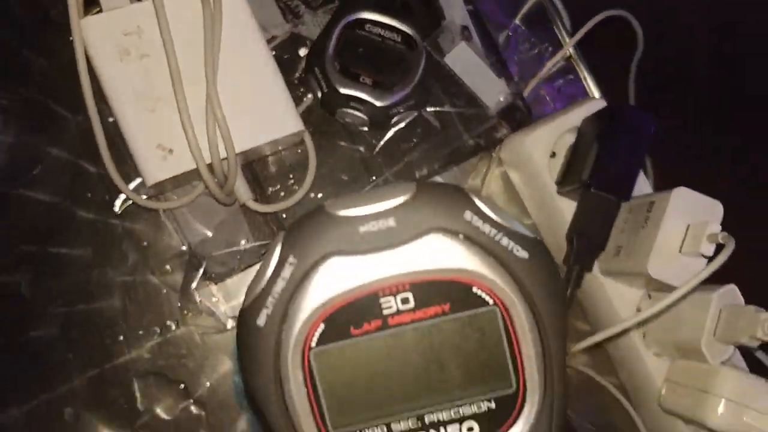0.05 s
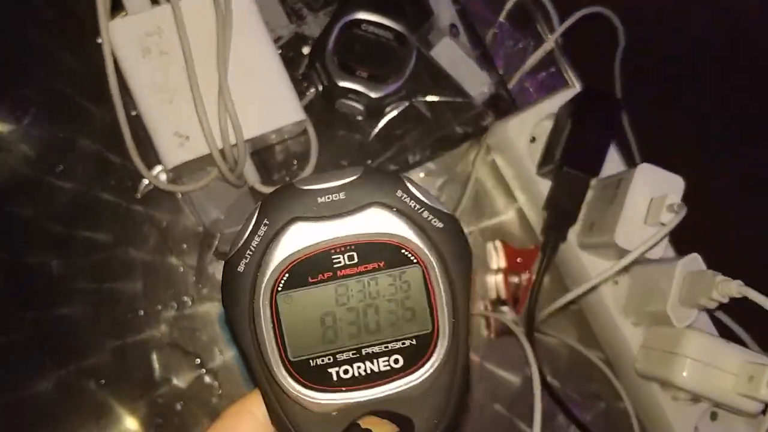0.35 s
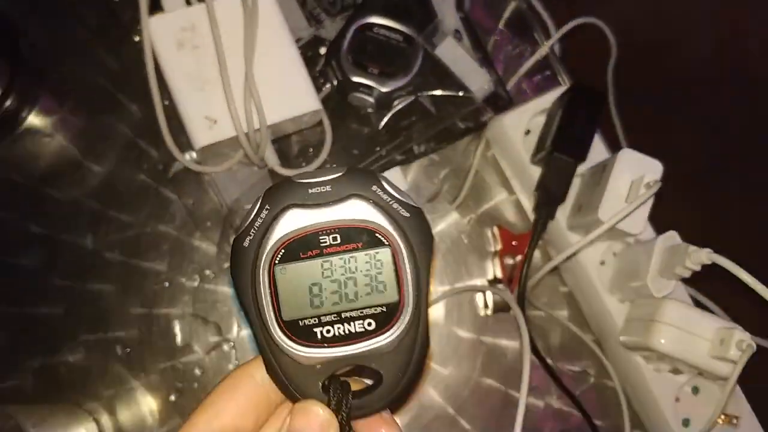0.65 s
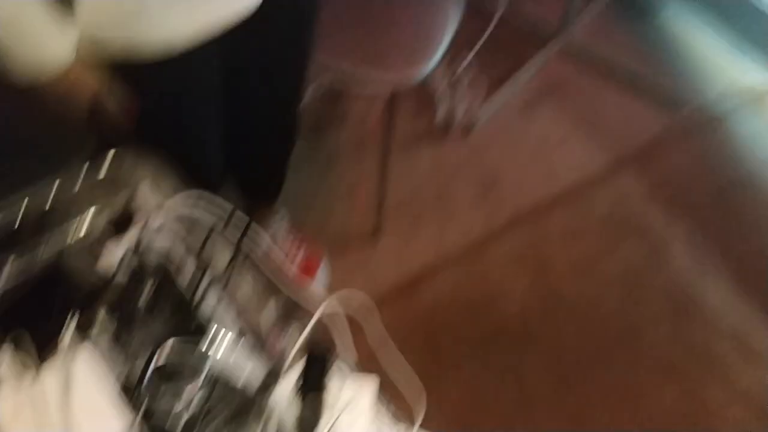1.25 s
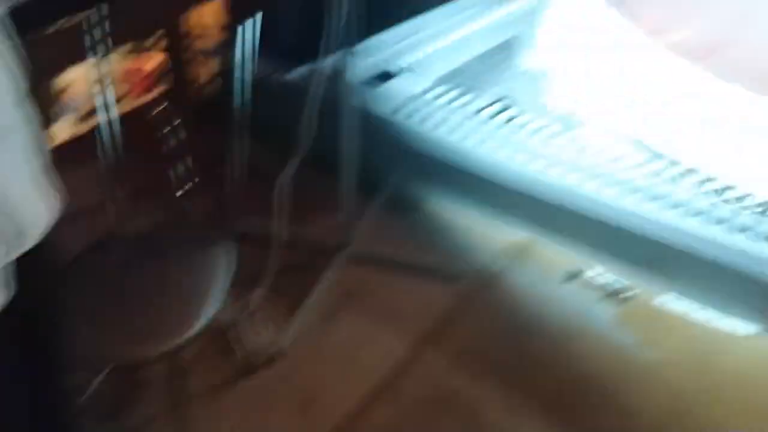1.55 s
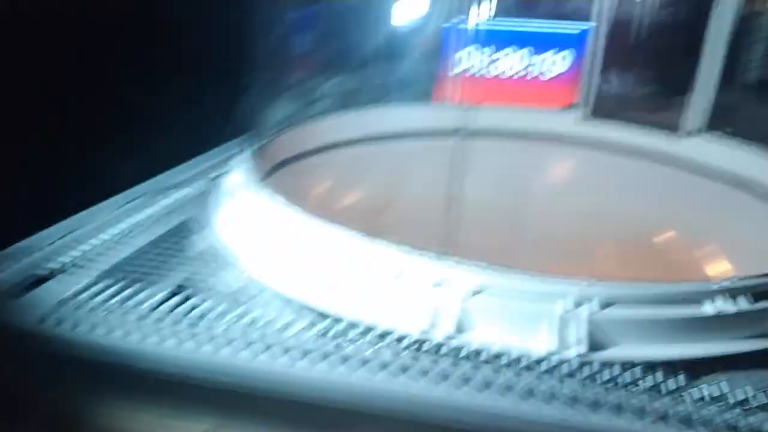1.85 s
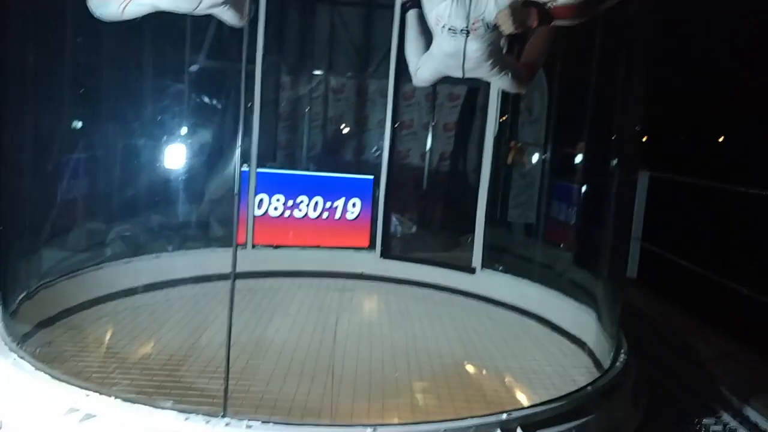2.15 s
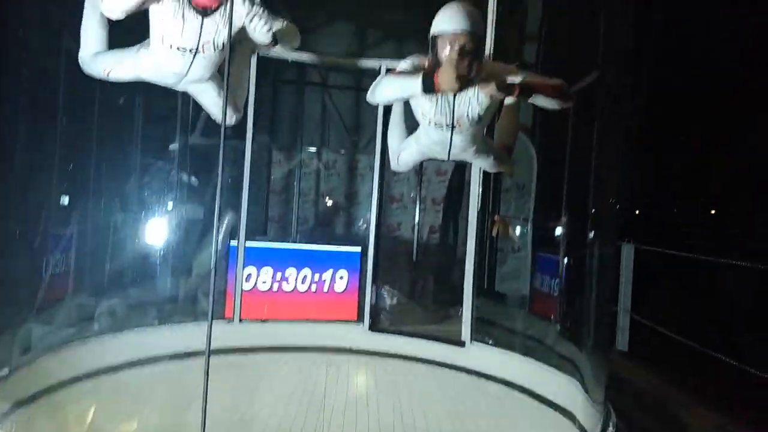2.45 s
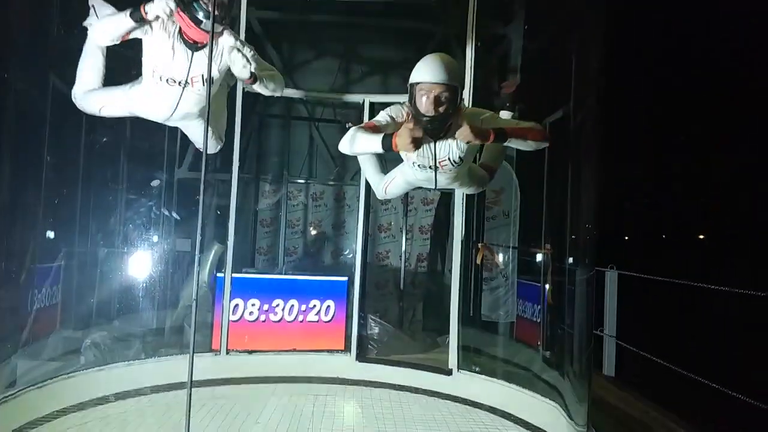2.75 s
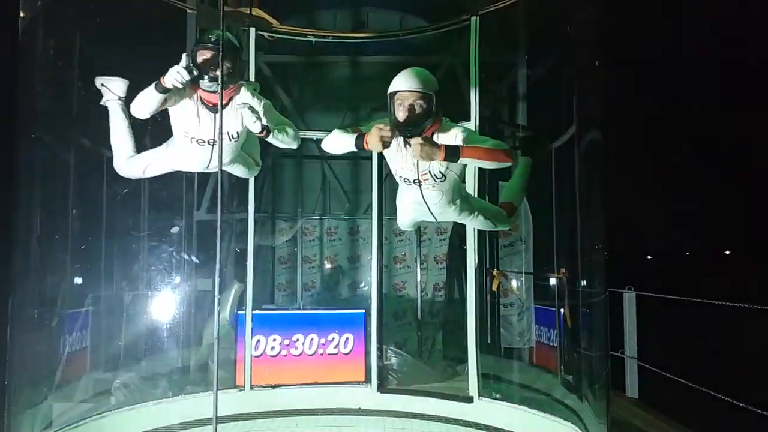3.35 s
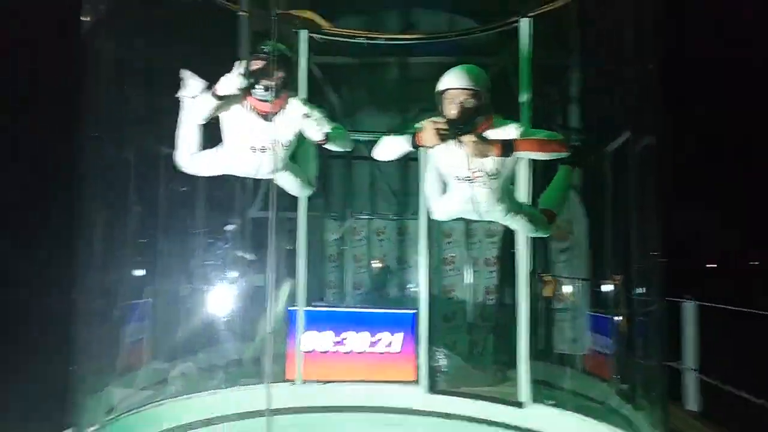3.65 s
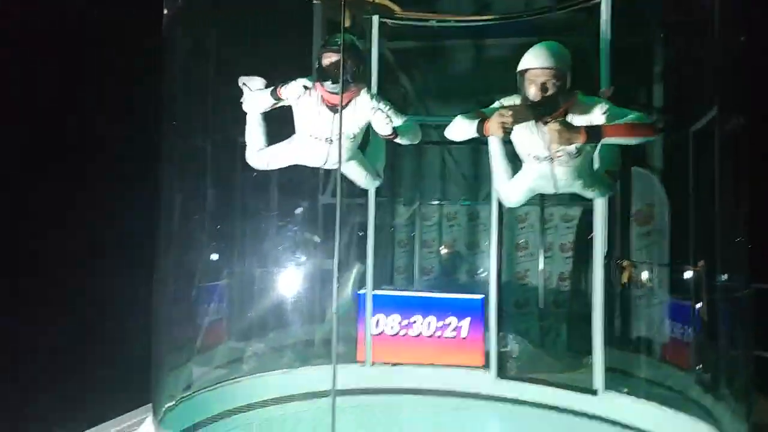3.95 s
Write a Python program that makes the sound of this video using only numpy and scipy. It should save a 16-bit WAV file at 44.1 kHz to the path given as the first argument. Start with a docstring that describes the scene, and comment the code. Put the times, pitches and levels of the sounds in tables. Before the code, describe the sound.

A loud, continuous wind tunnel roar booms and buffets close to a handheld microphone. The rush is dull at first, with one faint bump, then opens into hissing, shrill air as the microphone faces the chamber.

```python
"""A vertical wind tunnel at full flow. From the start its duct booms near 200 Hz under a churning
roar of fans and air; the camera faces away and hears a dull rush. At 1.4 s, one soft knock as the
camera is moved. Near 2.3 s it swings round to the chamber: the hiss of the air stream opens up and
a shrill band near 4.4 kHz swells. Both stay up to the end."""
import sys
import numpy as np
from scipy import signal
from scipy.fft import rfft, irfft, next_fast_len
from scipy.io import wavfile
from scipy.ndimage import uniform_filter1d, map_coordinates

SR = 44100
rng = np.random.default_rng(int(sys.argv[2]) if len(sys.argv) > 2 else 0)


def inscribe(sig):
    """Save sig as 16-bit PCM at rate SR to the path in sys.argv[1].

    A 1-D sig is mono; a 2-D sig holds one channel per row.
    Samples are clipped to [-1, 1] before scaling.
    """
    pcm = np.round(np.clip(np.atleast_2d(sig).T, -1, 1) * 32767)
    wavfile.write(sys.argv[1], SR, pcm.astype(np.int16))


N = 176400


def amp(db):
    """dB to gain."""
    return 10 ** (np.asarray(db) / 20)


def unit(x):
    """Scale to rms 1."""
    return x / np.sqrt(np.mean(x ** 2) + 1e-20)


def curve(rows):
    """(time_s, value) rows to one value per sample."""
    return np.interp(np.arange(N) / SR, *np.transpose(rows))


def wobble(rate_hz):
    """Smooth random curve, rate_hz knots per second."""
    return map_coordinates(rng.standard_normal(2048), [np.arange(N) * rate_hz / SR], mode="wrap")


def filtered(x, response):
    """Zero-phase filter with gain response(hz)."""
    size = next_fast_len(N + SR // 2)
    return irfft(rfft(x, size) * response(np.fft.rfftfreq(size, 1 / SR)), size)[:N]


def coloured(x, colour):
    """Shape x by (freq_hz, gain_db) rows on a log axis; rms 1."""
    freq_hz, gain_db = np.transpose(colour)
    return unit(filtered(x, lambda hz: amp(np.interp(np.log(hz + 1), np.log(freq_hz + 1), gain_db))))


def turbulence(colour, patchy_db):
    """Coloured noise, rms 1; eddies make patches of random gain."""
    spectrum = signal.stft(rng.standard_normal(N), nperseg=512)[2]
    eddies = uniform_filter1d(rng.standard_normal(spectrum.shape), size=3, axis=0)
    eddies = uniform_filter1d(eddies, size=12, axis=1)
    noise = signal.istft(spectrum * amp(patchy_db * unit(eddies)))[1][:N]
    return coloured(noise, colour)


def flow(levels, colours, patchy_db, flutter_db, flutter_hz):
    """Fluttering turbulence that changes colour as the camera turns to the chamber."""
    turn_mid_s, turn_length_s = 2.31, 0.19
    freq_hz, away_db, facing_db = np.transpose(colours)
    away = turbulence(list(zip(freq_hz, away_db)), patchy_db)
    facing = turbulence(list(zip(freq_hz, facing_db)), patchy_db)
    turned = np.clip(.5 + (np.arange(N) / SR - turn_mid_s) / turn_length_s, 0, 1)
    gain = amp(curve(levels) + flutter_db * wobble(flutter_hz))
    return gain * (np.sqrt(1 - turned) * away + np.sqrt(turned) * facing)


def reflections(x, low_cut_hz=342, sway_s=0.00017, echo_db=-22):
    """Weak echoes off nearby surfaces; delays drift as the hand-held camera sways."""
    bright = filtered(x, lambda hz: hz ** 2 / (hz ** 2 + low_cut_hz ** 2))
    echoes = np.zeros(N)
    for mean_delay_s in np.geomspace(.0018, .009, 6):
        delay_s = mean_delay_s + sway_s * wobble(rate_hz=1.5)
        echoes += map_coordinates(bright, [np.arange(N) - delay_s * SR])
    return amp(echo_db) * echoes


def knock(attack_s=0.00091, t60_s=0.045):
    """Dull handling knock: a noise burst half buried in the roar."""
    # impact: start_s, level_db
    hits = [(1.366, -8.5)]
    # spectrum: freq_hz, gain_db
    colour = [(300, -15), (900, 18), (1400, 11), (2200, 8.5), (3500, -7), (7000, -25), (11000, -58)]
    out = np.zeros(N)
    for start_s, level_db in hits:
        age_s = np.maximum(np.arange(N) / SR - start_s, 0)
        envelope = (1 - np.exp(-age_s / attack_s)) * np.exp(-np.log(1000) * age_s / t60_s)
        out += amp(level_db) * envelope * coloured(rng.standard_normal(N), colour)
    return out


def hiss(trim_db=2.5, shade_per_octave=0.35, pivot_hz=8100):
    """Air-stream hiss, weaker and darker while the camera faces away."""
    # envelope: time_s, level_db
    levels = [(0, -49.5), (1.11, -48.5), (1.34, -46), (1.75, -49.5), (1.94, -45), (2.11, -47.5), (2.2, -41),
              (2.27, -39), (2.39, -24), (2.83, -24), (3.05, -25.5), (3.45, -25), (3.62, -23.5), (4, -24.5)]
    # spectrum facing the chamber: freq_hz, gain_db
    colour = [(2000, -30), (4000, -1.5), (5300, 1.5), (6300, 2), (7400, 3), (8500, 2), (9400, 1.5),
              (9750, -2.5), (10200, -10.5), (10800, -25), (11200, -33)]
    freq_hz, time_s, spectrum = signal.stft(turbulence(colour, patchy_db=.6), SR, nperseg=256)
    level_db = np.interp(time_s, *np.transpose(levels))
    facing_db = level_db.max()
    shade = np.clip(1 + shade_per_octave * np.log2((freq_hz[:, None] + 1) / pivot_hz), 0, 2)
    shaded = spectrum * amp(shade * (level_db - facing_db))
    return amp(trim_db + facing_db) * signal.istft(shaded)[1][:N]


def whistle(centre_hz, width_hz, wander_hz, flare_db):
    """Narrow air-stream resonance; wanders in pitch, flares briefly."""
    def baseband():
        return unit(filtered(rng.standard_normal(N), lambda hz: 1 / (1 + (2 * hz / width_hz) ** 4)))
    in_phase, quadrature = baseband(), baseband()
    pitch_hz = centre_hz + wander_hz * wobble(rate_hz=20)
    phase = 2 * np.pi * np.cumsum(pitch_hz) / SR
    band = in_phase * np.cos(phase) + quadrature * np.sin(phase)
    return unit(amp(flare_db * wobble(rate_hz=26)) * band)


def air(rush_db=2.03, shrill_db=-0.36, low_whistle_db=-9.5, high_whistle_db=-4.5):
    """Dull rush and shrill band of the air stream, each with a breathy whistle."""
    # envelopes: time_s, level_db
    rush_levels = [(0, -25.5), (.85, -26), (1.0, -27.5), (1.8, -26.5), (2.1, -26.5), (2.18, -22.5),
                   (2.31, -25.5), (2.44, -30.5), (2.7, -31.5), (4, -30.5)]
    shrill_levels = [(0, -26.5), (.6, -25), (.85, -25), (1.0, -27.5), (1.45, -26.5), (1.8, -27.5),
                     (2.14, -26), (2.21, -20), (2.26, -19.5), (2.305, -16), (2.36, -20.5), (2.45, -21),
                     (2.6, -23.5), (2.83, -19.5), (3.0, -22), (3.6, -20.5), (4, -20)]
    # spectra: freq_hz, away_db, facing_db
    rush_colours = [(600, -47, -43), (1370, -13, 0.5), (1880, -0.1, -1), (2440, 3.5, -2), (2890, 2.4, 1),
                    (3700, -3.5, 1.5), (4500, -10.5, -14), (5470, -6, -24), (6550, -16, -10),
                    (7600, -39, -36), (10000, -72, -68)]
    shrill_colours = [(3000, -40, -41), (3720, -7, -23), (3970, 2.5, 0.5), (4670, 0, 1), (4930, -1, -1.5),
                      (5310, -10, -8), (6340, -31, -13.5), (7540, -63, -50)]
    rush = flow(rush_levels, rush_colours, patchy_db=1.83, flutter_db=1.23, flutter_hz=22)
    shrill = flow(shrill_levels, shrill_colours, patchy_db=2.0, flutter_db=0.47, flutter_hz=22)
    low = whistle(centre_hz=2556, width_hz=200, wander_hz=45.34, flare_db=4.5)
    high = whistle(centre_hz=4370, width_hz=350, wander_hz=94.95, flare_db=1.8)
    low *= amp(curve(rush_levels) + low_whistle_db)
    high *= amp(curve(shrill_levels) + high_whistle_db)
    return amp(rush_db) * rush + amp(shrill_db) * shrill + low + high


def buffeting(trim_db=-1.5, flutter_db=1.5):
    """Lumpy low buffeting of the flow."""
    # envelope: time_s, level_db
    levels = [(0, -40), (.45, -29), (.68, -28), (.95, -28), (1.18, -20), (1.35, -28), (1.62, -20.5),
              (1.77, -23.5), (1.94, -20.5), (2.1, -22), (2.25, -38), (2.42, -24), (3.2, -34), (3.47, -24.5),
              (4, -44)]
    # spectrum: freq_hz, gain_db
    colour = [(150, -56), (240, 6), (310, 1), (430, 2), (520, -17), (700, -16), (1300, -62)]
    level_db = trim_db + curve(levels) + flutter_db * wobble(rate_hz=23.83)
    return amp(level_db) * turbulence(colour, patchy_db=2.5)


def duct_boom(trim_db=-1.5):
    """The duct booms near 200 Hz."""
    # envelope: time_s, level_db
    levels = [(0, -21), (.9, -19), (1.05, -23.5), (1.35, -18.5), (1.8, -22.5), (2.15, -23), (2.3, -29),
              (2.45, -22.5), (2.6, -21), (2.8, -30.5), (3.15, -22.5), (3.42, -30.5), (3.58, -22.5),
              (4, -26.5)]
    # spectra: freq_hz, away_db, facing_db
    colours = [(25, -72, -63), (55, -60, -62), (77, -40, -35), (124.7, -19, -16.5), (155.5, -7.5, -20),
               (170, -5, -17), (195, 2, 4.5), (212.4, 2.5, 2.5), (227.4, -9.5, 6.5), (308, -20, -56),
               (700, -91, -74)]
    return amp(trim_db) * flow(levels, colours, patchy_db=0.5, flutter_db=0.8, flutter_hz=17)


def fan_roar(trim_db=0.5):
    """Broad, churning turbulence of fans and air."""
    # envelope: time_s, level_db
    levels = [(0, -20), (.25, -20), (.5, -21), (.95, -21), (1.09, -20.5), (1.3, -20.5), (1.7, -21.5),
              (1.95, -20.5), (2.15, -20), (2.38, -23.5), (2.9, -20.5), (3.4, -21.5), (4, -21.5)]
    # spectra: freq_hz, away_db, facing_db
    colours = [(30, -77, -70), (79.6, -53.5, -35), (167, -25.5, 0), (236, -4.5, -3.5), (275, 1, 4),
               (305, -2.5, -1), (440, -4, -3.5), (540, -3.5, -2.5), (650, -3.5, -6), (917, -9, -8),
               (1484, -12, -15.5), (2360, -24, -18.5), (5000, -35, -38), (9000, -78, -68)]
    return amp(trim_db) * flow(levels, colours, patchy_db=2.5, flutter_db=0.46, flutter_hz=20)


def scene():
    """All sources plus reflections, mono."""
    direct = duct_boom() + fan_roar() + buffeting() + air() + hiss() + knock()
    return (direct + reflections(direct))[None]


def record(dry):
    """Brick-wall low-pass: nothing is heard above about 11 kHz."""
    top_hz = 11111
    return np.array([filtered(x, lambda hz: hz < top_hz) for x in dry])


dry = scene()
out = record(dry)
inscribe(out)
```